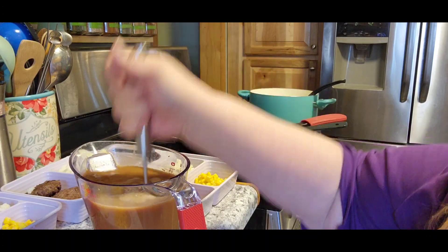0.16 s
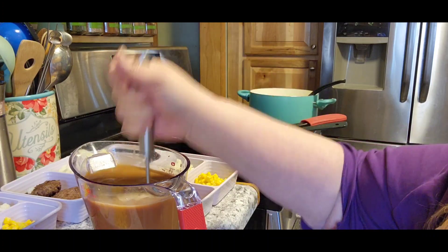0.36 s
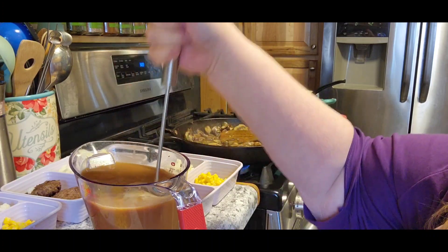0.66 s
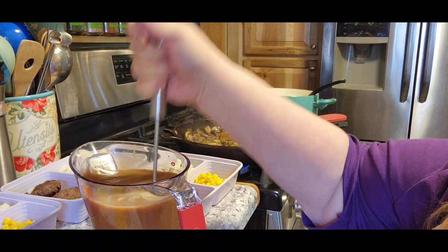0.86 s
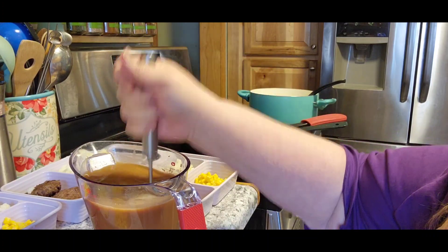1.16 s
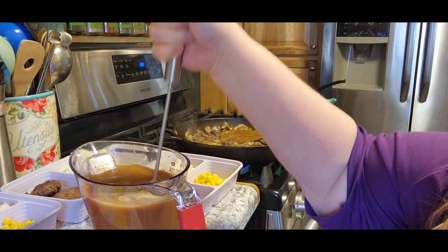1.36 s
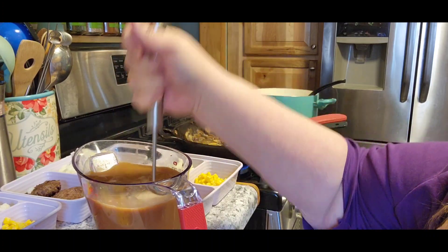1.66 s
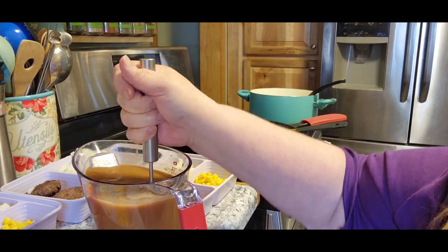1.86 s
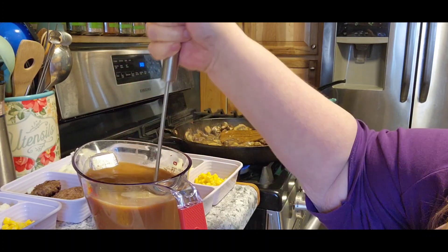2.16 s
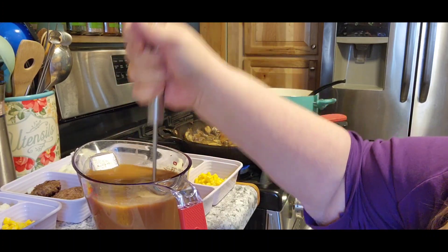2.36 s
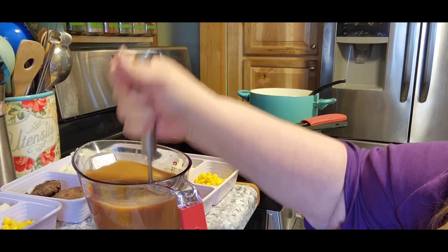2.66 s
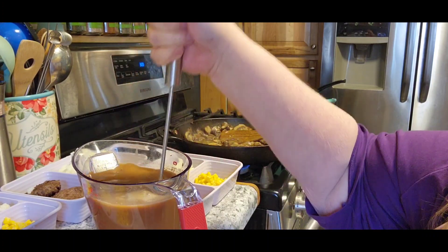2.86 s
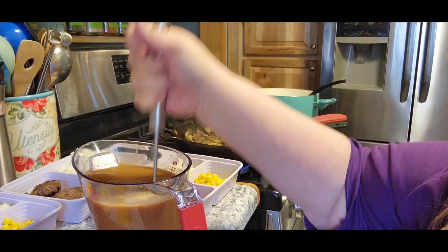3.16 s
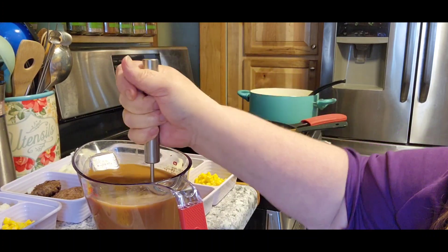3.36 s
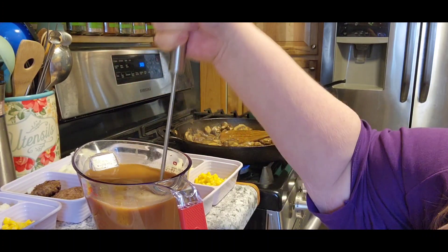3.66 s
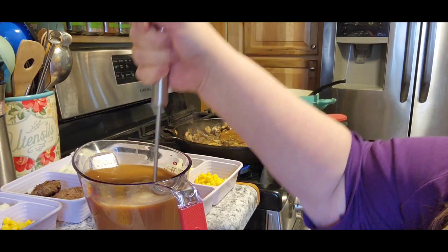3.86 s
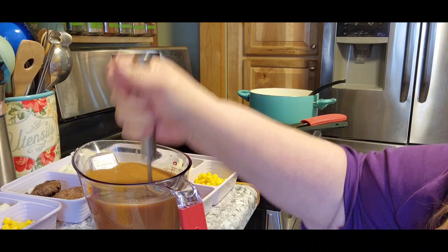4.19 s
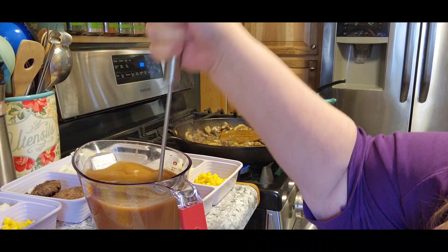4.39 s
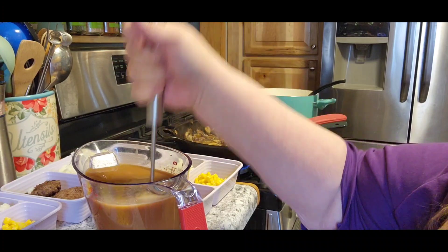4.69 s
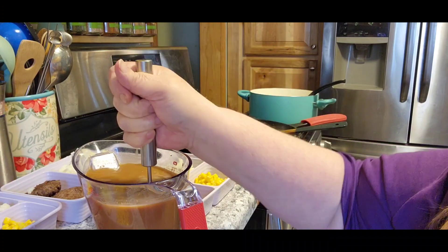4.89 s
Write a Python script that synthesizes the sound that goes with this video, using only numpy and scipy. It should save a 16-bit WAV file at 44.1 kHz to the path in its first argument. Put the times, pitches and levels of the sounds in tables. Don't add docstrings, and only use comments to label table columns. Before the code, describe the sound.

A sprung metal hand whisk is pumped in a glass jug of gravy, seven loud clacking slams with rasping strokes between them.

```python
import sys
import numpy as np
from scipy import signal
from scipy.fft import rfft, irfft, next_fast_len
from scipy.io import wavfile
from scipy.ndimage import uniform_filter1d, minimum_filter1d, map_coordinates

SR = 44100
rng = np.random.default_rng(int(sys.argv[2]) if len(sys.argv) > 2 else 0)


def to_wav(sig):
    pcm = np.clip(np.atleast_2d(sig), -1, 1) * 32767
    pcm = np.round(pcm).astype(np.int16)
    wavfile.write(sys.argv[1], SR, pcm.T)


def gain_from_db(level_db):
    decades = np.asarray(level_db, float) / 20
    return 10 ** decades


N = 221778

# time in seconds, peak level in dB, brightness in dB,
# counter shake in dB, gap between bounces in seconds.
SLAMS = [
    (0.039, 0.5, -16.5, 3.5, 0.009),
    (0.812, 0.5, -20.5, -0.5, 0.0071),
    (1.626, 4, -25, 2, 0.0089),
    (2.343, 1, -22, -3, 0.0085),
    (3.11, 2, -28, 3.5, 0.0095),
    (3.929, 3.5, -17.5, 4, 0.0091),
    (4.69, 2.5, -16.5, 4.5, 0.009),
]
# start in seconds, #
# stop in seconds, first scrape level in dB, scrape level late in the push in dB, counter shake at the bottom in
# dB.
PUSHES = [
    (0.171, 0.319, -48.5, -36, -27.5),
    (0.982, 1.161, -43, -36, -25.5),
    (1.736, 1.886, -47.5, -37, -29),
    (2.466, 2.634, -42.5, -38.5, -28),
    (3.309, 3.397, -35, -36.5, -28),
    (4.094, 4.162, -36.5, -32, -24),
    (4.789, 4.938, -56, -33, -30),
]
# start in seconds, slowing from in seconds, scrape level in dB,
# jug over scrape in dB, counter shake in dB.
RETURNS = [
    (0.488, 0.558, -34, -1, -47),
    (1.292, 1.369, -36.5, -0.5, -40.5),
    (2.029, 2.116, -38.5, 1.5, -38.5),
    (2.779, 2.859, -36, 0, -35),
    (3.545, 3.613, -35, -2, -35),
    (4.323, 4.388, -34.5, 2, -35),
]
# start in seconds, stop in seconds, scrape level in dB,
# jug over scrape in dB, tray shake in dB.
SLIDES = [(0.645, 0.701, -48.5, 3.5, -38), (0.959, 1, -50.5, 8, -36.5), (1.438, 1.435, -47.5, 10, -40.5),
          (1.577, 1.603, -68.5, 19.5, -36), (2.202, 2.241, -48.5, 6, -37), (2.409, 2.46, -54.5, 16, -41),
          (2.939, 2.99, -52.5, 7.5, -44.5), (3.221, 3.33, -49.5, -1, -38), (3.709, 3.712, -39.5, -6, -47),
          (4.005, 4.074, -53, 10.5, -46), (4.5, 4.513, -40, -8.5, -48.5), (4.56, 4.592, -78, 19, -41.5),
          (4.768, 4.792, -52.5, 0.5, -38)]
# time in seconds, jug knock peak in dB, click in dB, counter thump in dB.
LANDINGS = [(0.325, -17, -30.5, -18.5), (1.159, -36.5, -29, -36.5), (1.168, -18, -34, -27),
            (1.897, -16, -35, -25), (2.614, -21, -27.5, -22), (2.639, -17.5, -44.5, -17.5),
            (3.409, -25.5, -49, -27), (4.151, -25, -21, -19), (4.167, -12, -39.5, -30),
            (4.922, -26, -19, -39), (4.941, -16, -46.5, -48)]
# time in seconds, jug knock peak in dB, click in dB.
CATCHES = [(0.18, -58, -33), (0.495, -35, -40), (0.643, -26.5, -47.5), (0.661, -32, -33.5),
           (0.976, -37, -40.5), (0.993, -22, -29.5), (1.085, -31, -35), (1.291, -46, -36),
           (1.331, -14.5, -40), (1.428, -41, -52.5), (1.748, -24.5, -36), (1.766, -34, -35.5),
           (2.028, -40, -41), (2.067, -14.5, -43.5), (2.476, -20.5, -28.5), (2.581, -30, -21.5),
           (2.782, -12.5, -32), (3.235, -44.5, -37), (3.303, -35, -40.5), (3.543, -28, -32),
           (3.704, -24.5, -42), (4.103, -41, -31.5), (4.326, -52, -34), (4.351, -16, -30),
           (4.492, -29, -36.5), (4.831, -56, -36.5)]
# time in seconds, peak level in dB, click in dB.
PINGS = [
    (0.69, -37.5, -42),
    (1.579, -34, -54.5),
    (2.138, -23, -36.5),
    (2.194, -32.5, -44.5),
    (2.23, -30.5, -50.5),
    (2.962, -41, -42),
    (2.985, -44.5, -53),
]

# centre in Hz, width in Hz, level in dB.
JUG_STRUCK = [(385.4, 30, -7.5), (468.6, 37, -6.5), (606, 49, -7), (744, 72, -8), (791, 18, 0),
              (900, 37, 0), (1016, 170, -5.5), (1146, 70, 2.5), (1260, 41, 6.5), (1392, 47, -1),
              (1462, 52, -8.5), (1730, 260, -12.5), (1710, 39, -15.5), (1872, 21, -0.5), (2029, 69, 4),
              (2160, 120, -7.5), (2210, 99, -17.5), (2453, 23, -16), (2584, 160, -3.5), (2630, 73, -30),
              (2580, 140, -16), (3000, 33, -38), (3747, 40, -6), (4010, 33, -8), (4540, 240, -19.5),
              (5020, 360, -23)]
JUG_RUBBED = [(293.4, 13, -6), (371.2, 32, -4.5), (498, 20, -6), (670, 19.2, 4), (792, 19, 4.5),
              (927.5, 56, -1), (1089, 51, 1), (1204, 49, -1), (1537, 50, 5), (1846, 44, -3), (2005, 25, 4),
              (2255, 600, -9), (2770, 23, -10)]
HANDLE = [(4570, 150, -11), (4470, 120, -11), (5390, 700, 8), (6480, 380, 0), (6350, 60, 2.5),
          (7050, 590, 7), (7670, 900, 4.5), (11750, 550, -2.5), (13040, 1700, -5.5), (15260, 300, -21.5)]
SPRING = [(3290, 456, 10), (3823, 250, 5.5)]
COUNTER = [(75, 40, -7.5), (95.6, 16.8, 2.5), (124.7, 15.6, 4), (166, 17.3, -6.5), (182.5, 16.6, -8.5)]
TRAY = [(155.3, 20.6, -3), (114.2, 25, -7.5)]
PING = [(1860, 60, -1.5), (1970, 50, 0), (2260, 90, 1.5), (2630, 90, -1.5), (3060, 200, -10),
        (4300, 300, -11.5)]

# frequency in Hz, density in dB per Hz.
RASP = [(120, -43.5), (200, -35), (433, -12), (796, 4), (1310, -11), (1540, 7), (2830, -28.5), (3410, 6),
        (13600, -16.5), (16300, -46.5)]
# frequency in Hz, density in dB per Hz.
AIR = [(15, -8), (25, 9.5), (65, -28.5), (127, 7), (311, -28), (347, -19), (741, -15.5), (1210, -18),
       (7630, -29.5), (14600, -34.5), (16300, -44.5)]
# frequency in Hz, side over middle in dB.
WIDTH = [(60, -26), (110, -25), (200, -9.5), (380, -3), (700, -4), (1290, -3.5), (2380, -2.5), (4400, -1.5),
         (8120, 0), (15000, 1)]
# frequency in Hz, share from 0 to 1.
APART = [(150, .4), (500, 0.3), (2000, 1), (5000, .9), (14000, .93)]
# frequency in Hz, left minus right in dB.
LEAN = [(60, 1.5), (110, -0.5), (200, 0.5), (380, -1), (700, 1), (1290, -1), (2380, 3.5), (4400, 1.5),
        (8120, -0.5), (15000, 4.5)]
# frequency in Hz, time to die by 60 dB in seconds.
KITCHEN = [(150, 0.26), (1500, 0.22), (10000, 0.27)]


def strokes():
    scrape, jug, counter, spring, tray = motion()
    steel = driven(scrape - 3, grit(spiky_db=2.5, slip_db=2.0, patchy_db=1.9), body(HANDLE))
    hiss_force = grit(spiky_db=2.0, slip_db=3.0, patchy_db=-1.5)
    hiss = driven(scrape - 4, hiss_force, lambda f: gain_from_db(along(RASP, f)))
    coil = driven(spring - 1.5, grit(spiky_db=3.5, slip_db=-0.5, patchy_db=-8.0), body(SPRING))
    glass = driven(jug - 1.5, grit(spiky_db=3, slip_db=-0.5, patchy_db=4.5), body(JUG_RUBBED))
    stone = rumble(counter, COUNTER) + rumble(tray, TRAY)
    return ticks(scrape) + steel + hiss + coil + glass + stone + gain_from_db(jug - 10.5) * gurgle(count=1500)


def motion():
    scrape, jug, counter, tray = np.full((4, N), -120.)
    t = np.arange(N) / SR
    rise_s, rise_db, die_db = 0.025, 27, 45

    def lay(curve, s, db):
        corners = np.maximum.accumulate(s)
        np.maximum(curve, np.interp(t, corners, db, left=-120, right=-120), out=curve)

    def move(start, top, stop, first, peak, last, fall_s, jug_db):
        lay(scrape, [start - rise_s, start, top, stop, stop + fall_s],
            [first - rise_db, first, peak, last, last - die_db])
        lay(jug, [start - rise_s, start, top, stop, stop + 1.68 * fall_s],
            [jug_db(first) - rise_db, jug_db(first), jug_db(peak), jug_db(last), jug_db(last) - die_db])

    def shake(curve, start, stop, first, last):
        lag_s, fall_s, fall_db = 0.013, 0.1, 20
        corners = np.array([start - rise_s, start, stop, stop + fall_s, stop + 2 * fall_s])
        lay(curve, corners + lag_s, [first - fall_db, first, last, last - fall_db, -80])

    squeeze = np.zeros(N)
    push_fall_s = 0.071
    for start, stop, first, last, stone in PUSHES:
        fastest = start + 0.72 * (stop - start)
        move(start, fastest, stop, first, last, last - 1.5, push_fall_s, lambda db: -40 + 0.25 * (db + 39))
        shake(counter, start, stop, stone - 11.5, stone)
        squeeze += np.interp(t, [start, stop, stop + push_fall_s], [0, 1, 0])
    for start, stop, db, over, stone in RETURNS:
        move(start, start + 0.035, stop, db - 8, db, db - 3.5, 0.18, lambda db: db + over)
        shake(counter, start, stop, stone, stone - 5)
    for start, stop, db, over, stone in SLIDES:
        move(start, start, stop, db, db, db - 2.0, 0.065, lambda db: db + over)
        shake(tray, start, stop, stone - 3, stone)
    after_s = 0.097
    for s, db, bright_db, stone, gap in SLAMS:
        lay(scrape, [s - 0.012, s, s + after_s], [-75, -42, -68.5])
        lay(jug, [s - 0.004, s + 0.004, s + after_s, s + 2 * after_s], [-62, -35.5, -54.5, -80])
        shake(counter, s, s + 0.06, stone - 31, stone - 40)
    spring = scrape - 1 - 8.5 * squeeze
    return scrape, jug, counter, spring, tray


def grit(spiky_db, slip_db, patchy_db):
    clumps = slip_db * wobble(170) + slip_db * wobble(40)
    size = gain_from_db(spiky_db * rng.exponential(size=N) + clumps)
    z = signal.stft(size * rng.standard_normal((2, N)), nperseg=256)[2]
    field = uniform_filter1d(rng.standard_normal(z.shape[1:]), size=4, axis=0)
    field = uniform_filter1d(field, size=9, axis=1)
    colour = gain_from_db(patchy_db * unit(field))
    return unit(signal.istft(z * colour, nperseg=256)[1][:, :N])


def ticks(scrape):
    per_s, t60_s = 30, 0.009
    snag = (rng.random(N) < per_s / SR) * gain_from_db(3.5 * np.minimum(rng.exponential(size=N), 2.5))
    burst = signal.fftconvolve(snag, gain_from_db(-60 * np.arange(900) / SR / t60_s))[:N]
    bright = lambda f: body(HANDLE)(f) * (f / 8000) ** 0.73
    return driven(scrape - 13, unit(burst * rng.standard_normal((2, N))), bright)


def rumble(db, modes):
    shake = filtered(rng.standard_normal((2, N)), body(modes))
    steady = np.abs(uniform_filter1d(shake ** 2, size=900)) ** 0.15
    return gain_from_db(db - 1.8) * unit(shake / (steady + 1e-9))


def gurgle(count):
    when, pitch = rng.random(count), rng.standard_normal(count)
    big, spot = rng.exponential(size=count), rng.uniform(-0.21, 1, count)
    hz, t = (600 * np.exp(0.6 * pitch))[:, None], np.arange(1300) / SR
    life = 9 / hz
    swell = (t / life) * np.exp(-3 * t / life)
    tone = np.sin(2 * np.pi * hz * t * (1 + 0.081 * t / life))
    pops = gain_from_db(5.37 * np.minimum(big, 1.6))[:, None] * swell * tone
    first = (when * (N - len(t))).astype(int)[:, None]
    where = (first + np.arange(len(t))).ravel()
    sides = (1, 2.8 * spot[:, None])
    return unit(np.array([np.bincount(where, (pops * side).ravel(), N) for side in sides]))


def slams():
    steel, ring, stone = np.zeros((3, 2, N))
    lead = 600
    for s, db, bright_db, thump_db, gap in SLAMS:
        struck = np.zeros((2, SR // 3))
        struck[:, :lead] = gain_from_db(-39 + 0.04 * np.arange(-lead, 0)) * rng.standard_normal((2, lead))
        hit = lead / SR
        for k, (late, strong) in enumerate(rng.standard_normal((4, 2))):
            after = k * gap * (1 + 0.04 * late)
            fade_db = (-0.5 - 5.95 * k + 0.9 * strong) * (k > 0)
            add(struck, hit + after, fade_db - 2.5, t60=0.0012, rough=0.21)
            add(steel, s + after, db + bright_db - 3 * k - 0.5, t60=0.037, rough=30)
        add(struck, hit + 0.002843, -5, t60=0.00027, rough=0.42)
        add(struck, hit + 0.001515, -3, t60=0.029, rough=30)
        add(steel, s, db + bright_db - 3, t60=0.008, rough=30)
        add(stone, s, thump_db - 45.5, t60=0.0042, rough=0.3)
        clack = filtered(filtered(struck, soft(corner_hz=3300)), struck_jug(bright_db))
        ring[:, round(s * SR) - lead:][:, :SR // 3] += gain_from_db(db - 18.5) * clack / np.std(clack[0, :3000])
    return ring + steel_and_stone(steel, stone)


def struck_jug(bright_db):
    tilt_db = 5 + 0.2 * bright_db
    shift = rng.normal(0, 2.6, len(JUG_STRUCK))
    modes = [(hz, w, level + d + tilt_db * np.log2(hz / 1200)) for (hz, w, level), d in zip(JUG_STRUCK, shift)]
    one, other = body(modes, count=6), body(modes, count=2)
    direct = lambda f: gain_from_db(-14) * (1j * f / 600) / (1 + 1j * f / 600) ** 2
    return lambda f: np.array([one(f), gain_from_db(-3.5) * other(f)]) + direct(f)


def taps():
    steel, rubbed, stone, wire = np.zeros((4, 2, N))
    catches = [(*row, -42.5) for row in CATCHES]
    for s, knock_db, click_db, thump_db in [*LANDINGS, *catches]:
        add(steel, s, click_db + 7, t60=0.023, rough=30)
        add(rubbed, s, knock_db - 10.5, t60=0.0013, rough=1.0)
        add(stone, s, thump_db - 17.0, t60=0.0031, rough=0.63)
    for s, db, click_db in PINGS:
        add(wire, s, db, t60=0.014, rough=4)
        add(steel, s, click_db + 5, t60=0.02, rough=30)
    glass = filtered(filtered(rubbed, soft(corner_hz=2600)), body(JUG_RUBBED, count=2))
    return glass + filtered(wire, body(PING)) + steel_and_stone(steel, stone)


def steel_and_stone(steel, stone):
    crack = gain_from_db(-12) * filtered(steel, lambda f: gain_from_db(along(RASP, f)) * (f > 2500))
    return crack + filtered(steel, body([*HANDLE, *SPRING])) + filtered(stone, body(COUNTER))


def add(force, s, db, t60, rough):
    t = np.arange(SR // 12) / SR
    push = gain_from_db(-60 * t / t60) * (1 + rough * rng.standard_normal((2, len(t))))
    push /= np.linalg.norm(push, axis=1, keepdims=True)
    start = round(s * SR)
    room = force[:, start:start + len(t)]
    room += gain_from_db(db) * push[:, :room.shape[1]]


def soft(corner_hz):
    return lambda f: 1 / (1 + 1.3j * f / corner_hz - (f / corner_hz) ** 2)


def body(modes, count=1):
    def shape(f):
        total = 0
        for k, (c, w, db) in enumerate(modes):
            total = total + (-1) ** (k // count) * gain_from_db(db) * 1j * f * w / (c * c - f * f + 1j * f * w)
        return total
    peak = np.abs(irfft(shape(np.fft.rfftfreq(SR // 4, 1 / SR)))).max()
    return lambda f: shape(f) / peak


def driven(db, force, response):
    gain = np.sqrt(np.mean(np.abs(response(np.linspace(0, SR / 2, num=8000))) ** 2))
    return filtered(gain_from_db(db) * force, response) / gain


def filtered(x, response):
    n = x.shape[-1]
    m = next_fast_len(n + SR // 4, real=True)
    return irfft(rfft(x, m) * response(np.fft.rfftfreq(m, 1 / SR)), m)[..., :n]


def along(points, hz):
    f, v = np.transpose(points)
    return np.interp(np.log(hz + 1), np.log(f + 1), v)


def wobble(rate):
    return map_coordinates(rng.standard_normal(int(N * rate / SR) + 4), [np.arange(N) * rate / SR])


def unit(x):
    return x / np.sqrt(np.mean(x ** 2) + 1e-20)


def ports(pair):
    share = lambda f: np.clip(along(APART, f), 0, 1)
    twist = lambda f: 1.4j * np.cos(2 * np.pi * f * 0.00073)
    split = lambda f: np.sqrt([1 - share(f), share(f)]) * [twist(f), 1j + 0 * f]
    side = filtered(pair, lambda f: gain_from_db(along(WIDTH, f) - 1.5) * split(f)).sum(axis=0)
    return filtered(pair[0] + [side, -side], lambda f: gain_from_db(along(LEAN, f) * [[0.5], [-0.5]]))


def kitchen_echo(sound):
    late = np.pad(sound, (300, 0))[None]
    far = signal.fftconvolve(late, tail(KITCHEN, seconds=0.72), axes=1)[:, :N]
    return filtered(far, lambda f: f / (f + 300))


def tail(decays, seconds):
    hz, t, z = signal.stft(rng.standard_normal((2, int(seconds * SR))), SR, nperseg=256)
    echo = signal.istft(z * gain_from_db(-60 * t / along(decays, hz)[:, None]), SR, nperseg=256)[1]
    return echo / np.linalg.norm(echo[0])


def air():
    colour = lambda f: gain_from_db(along(AIR, f) + [0 * f, along(WIDTH, f)])
    mid, side = filtered(rng.standard_normal((2, N)), colour)
    return gain_from_db(-57.5 + 0.88 * wobble(3.6)) * np.array([mid + side, mid - side]) / np.std(mid)


def scene():
    pair = strokes() + slams() + taps()
    return ports(pair) + gain_from_db(-9.0) * kitchen_echo(pair[0]) + air()


def limited(x):
    span = round(0.0015 * SR)
    need = np.minimum(1, 0.97 / (np.abs(x).max(axis=0) + 1e-9))
    return x * uniform_filter1d(minimum_filter1d(need, size=2 * span), size=span)


def top_cut(x):
    return signal.sosfilt(signal.butter(12, 16520, fs=SR, output="sos"), x)


def record(dry):
    top_hz = 15850
    band = filtered(dry, lambda hz: np.where(hz < top_hz, 1, gain_from_db(-33.5)))
    return top_cut(limited(band))


dry = scene()
out = record(dry)
to_wav(out)
```